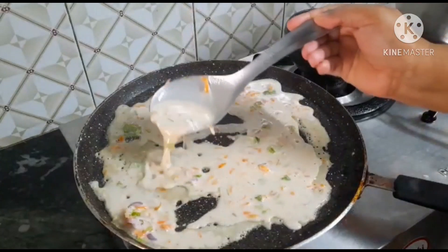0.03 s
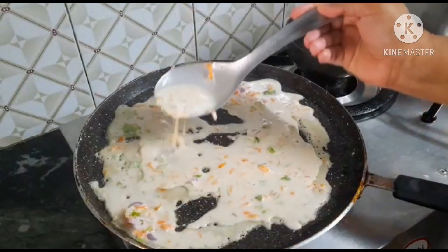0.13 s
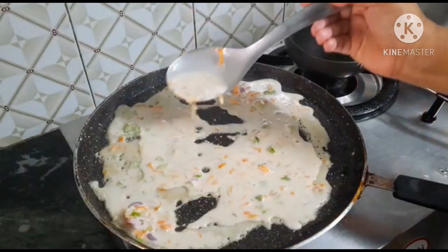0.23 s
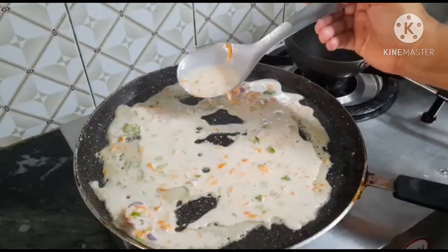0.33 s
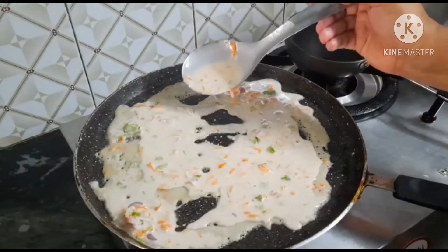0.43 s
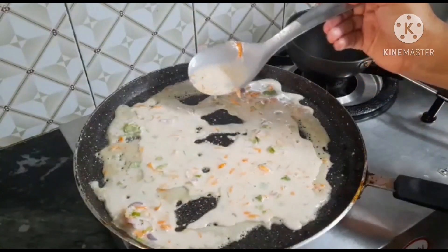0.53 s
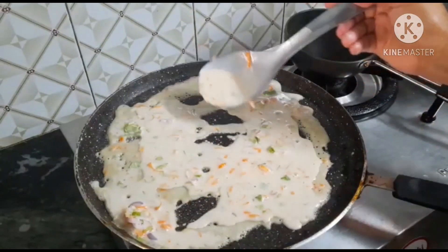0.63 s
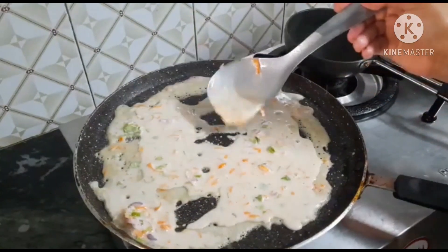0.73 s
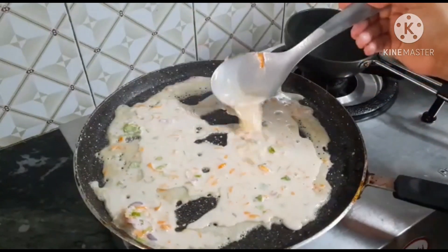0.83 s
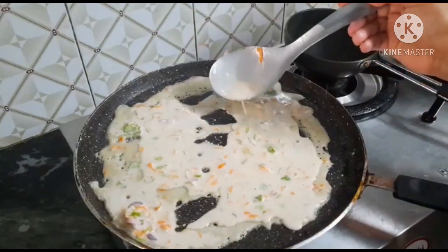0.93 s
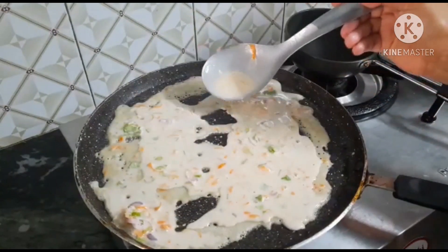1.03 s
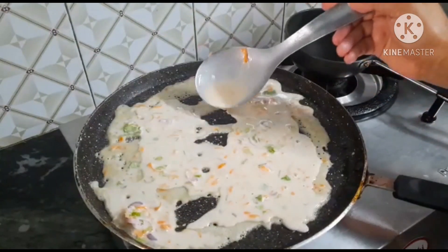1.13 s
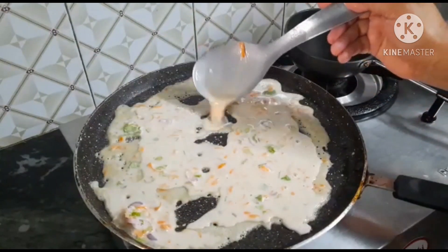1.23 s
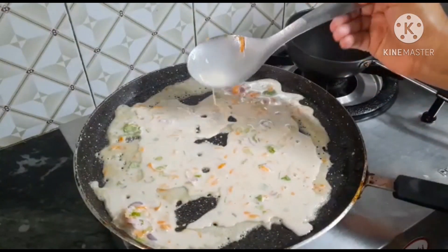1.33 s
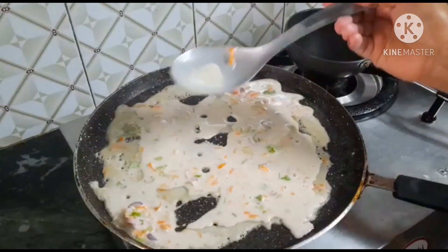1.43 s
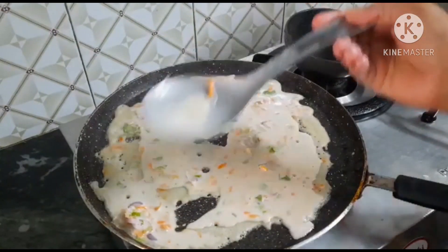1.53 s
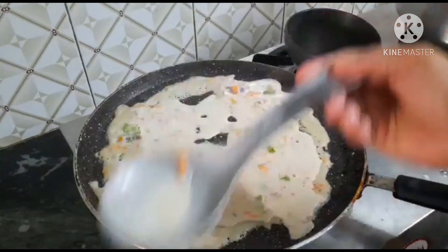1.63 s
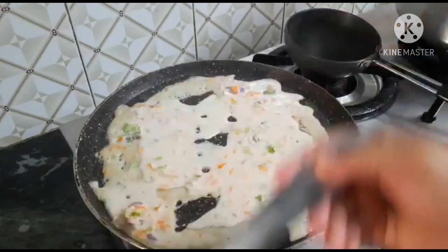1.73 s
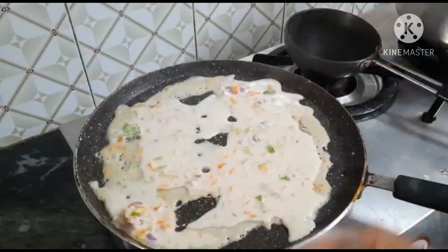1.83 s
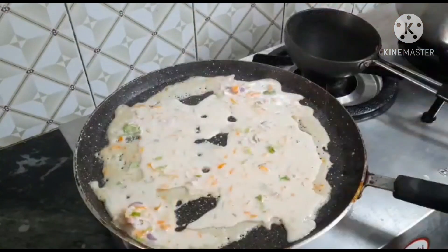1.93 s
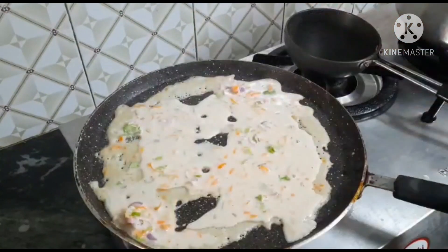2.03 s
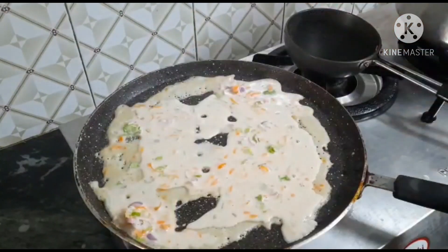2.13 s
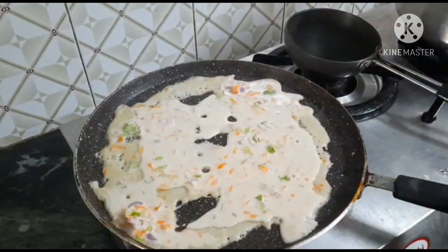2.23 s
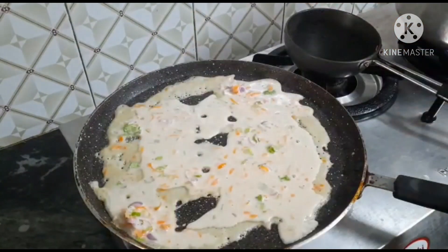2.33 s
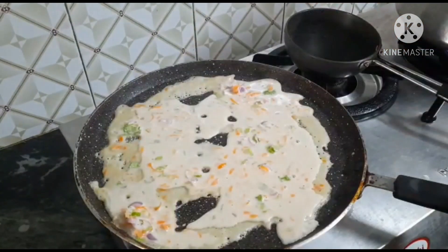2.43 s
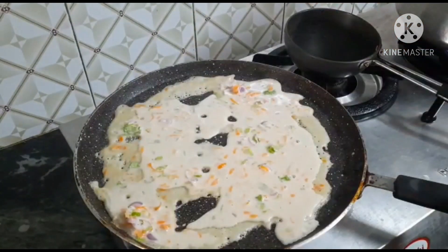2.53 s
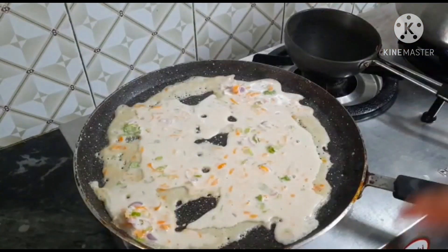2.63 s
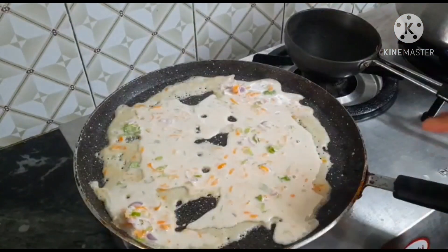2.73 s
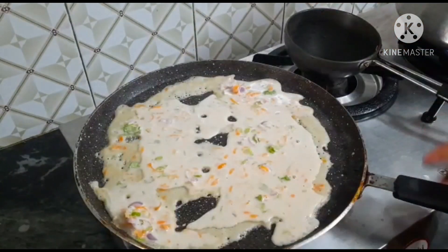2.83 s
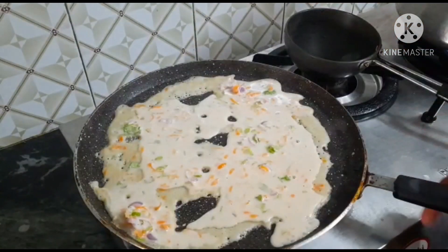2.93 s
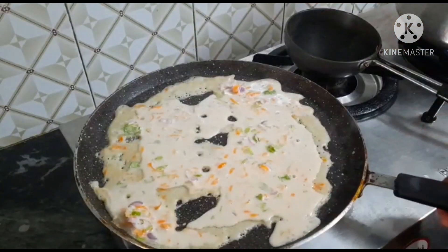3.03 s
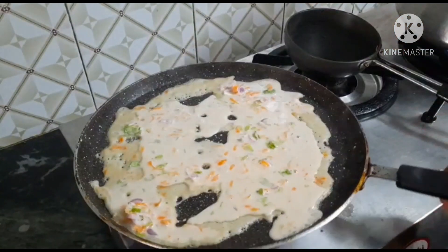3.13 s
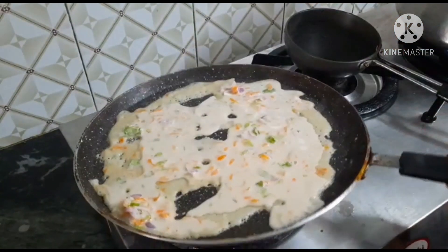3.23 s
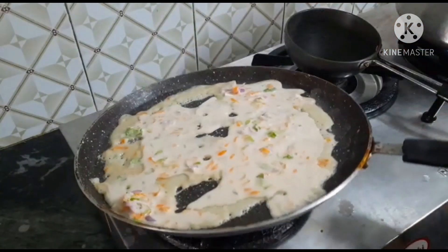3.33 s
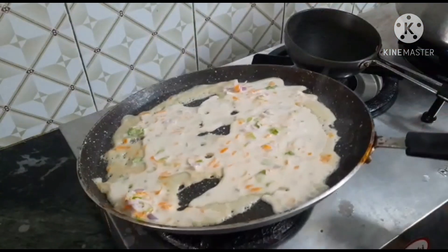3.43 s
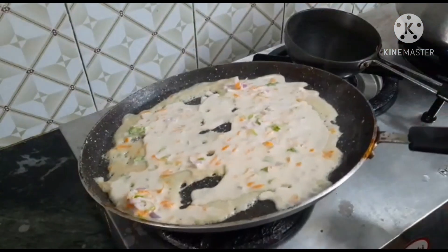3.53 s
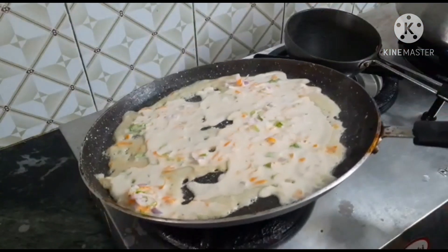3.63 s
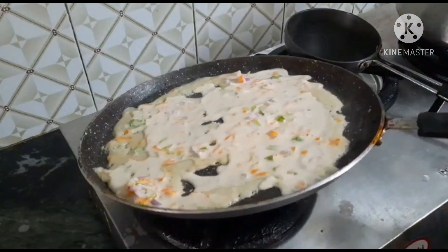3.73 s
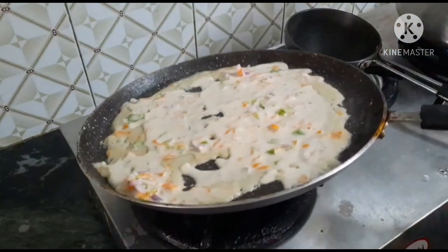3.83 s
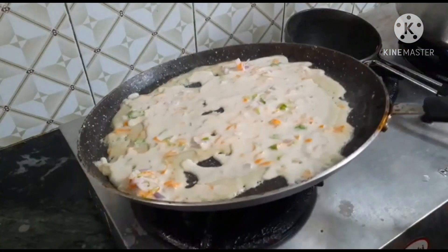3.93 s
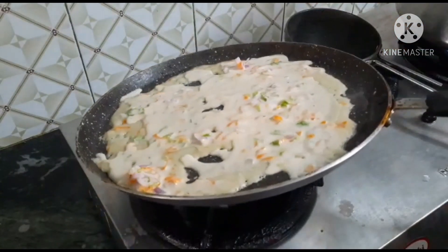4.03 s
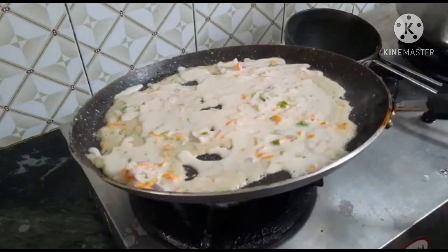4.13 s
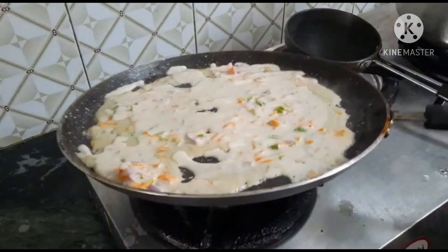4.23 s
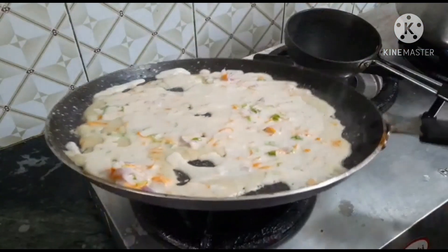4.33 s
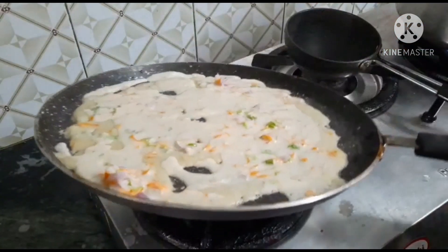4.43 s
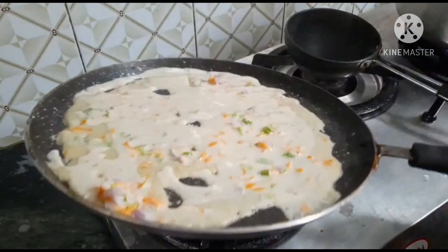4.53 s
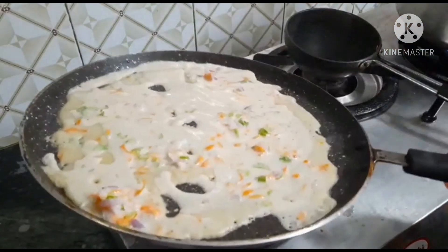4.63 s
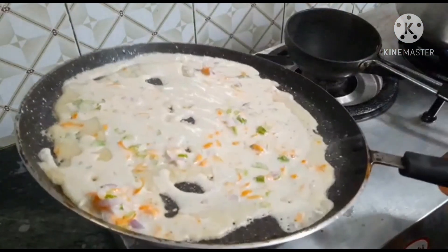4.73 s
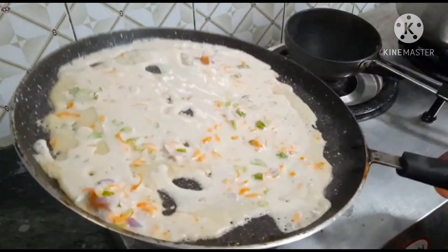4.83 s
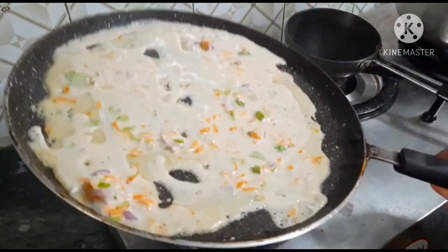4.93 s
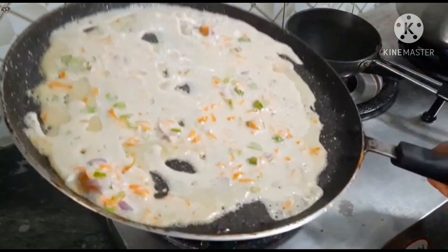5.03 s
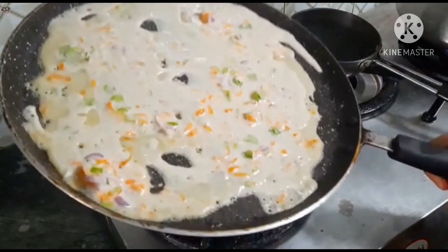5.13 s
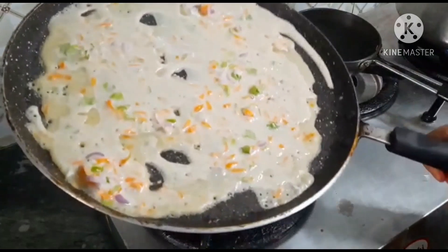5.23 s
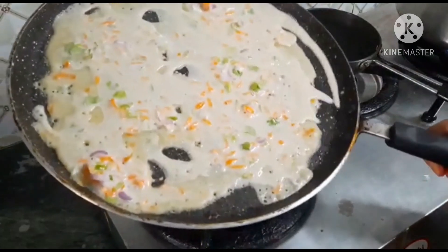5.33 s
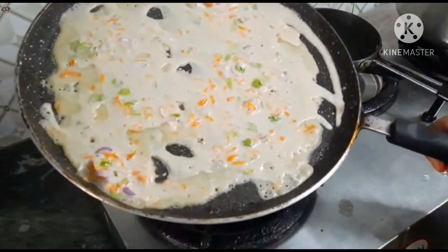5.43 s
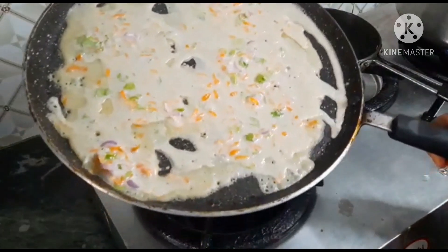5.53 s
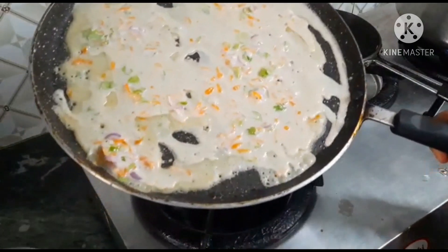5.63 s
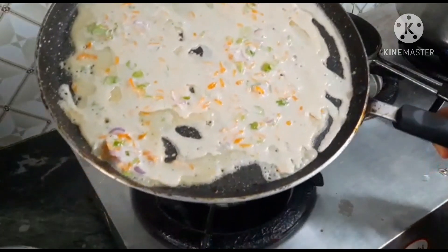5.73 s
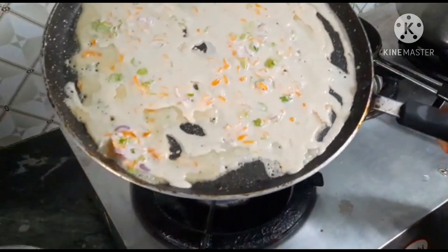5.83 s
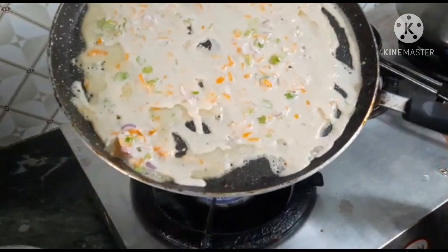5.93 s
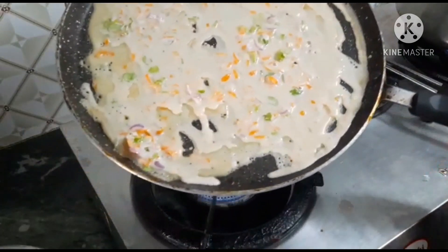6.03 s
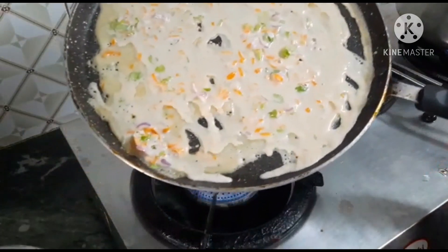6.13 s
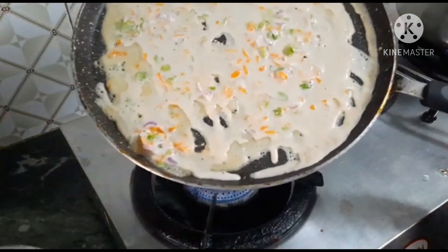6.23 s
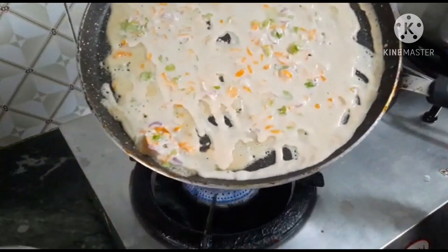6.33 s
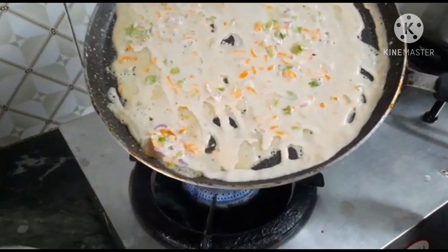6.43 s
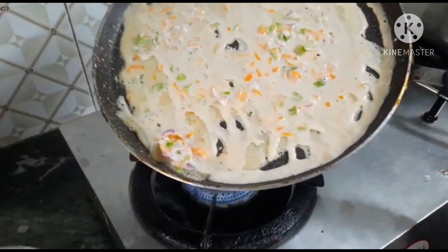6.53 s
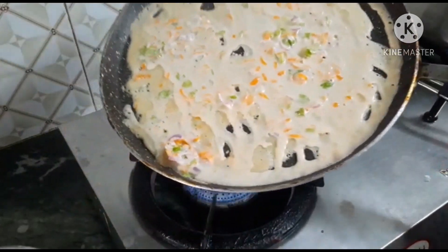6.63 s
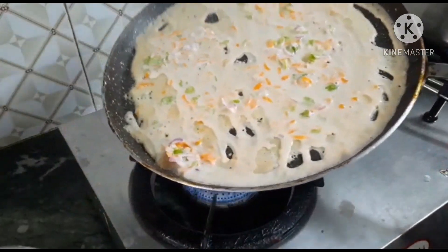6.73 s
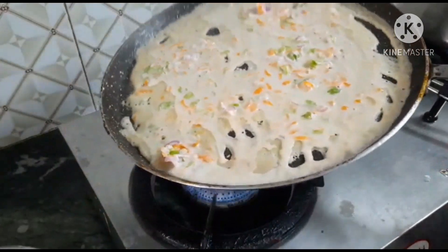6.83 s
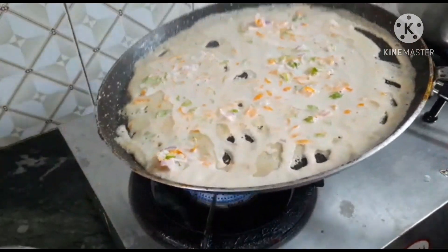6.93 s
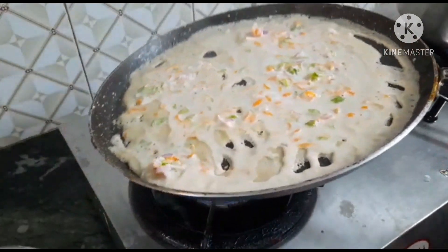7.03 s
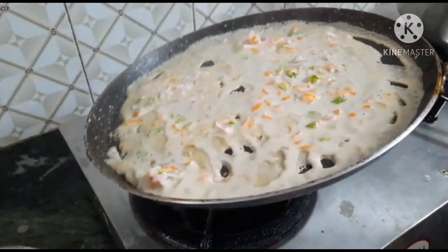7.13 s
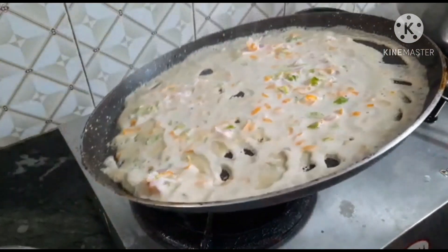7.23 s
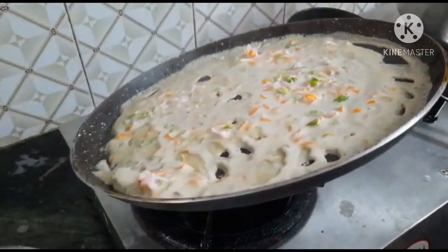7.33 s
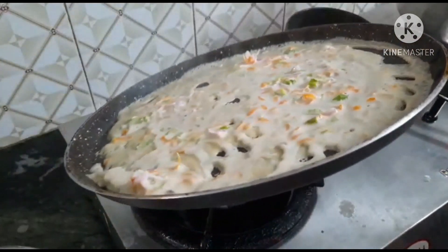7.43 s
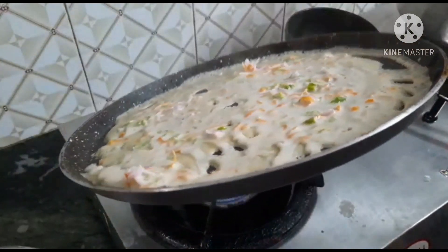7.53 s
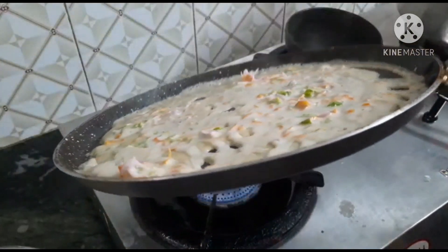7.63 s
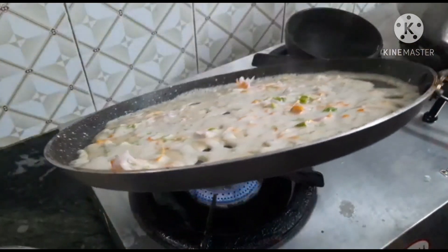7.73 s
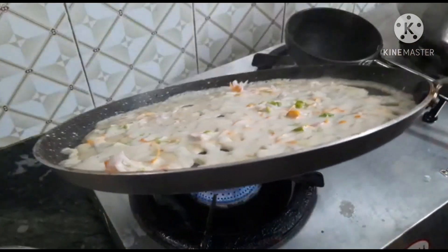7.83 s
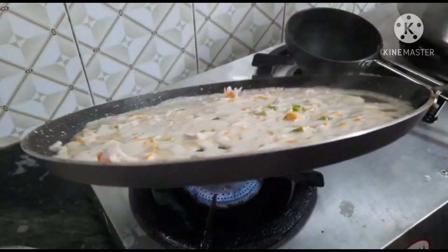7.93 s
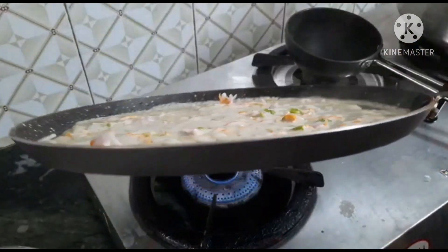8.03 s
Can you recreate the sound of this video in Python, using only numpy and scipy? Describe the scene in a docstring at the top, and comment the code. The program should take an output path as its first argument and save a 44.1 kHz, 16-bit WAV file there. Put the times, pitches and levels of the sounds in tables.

```python
"""Batter on a hot pan

Batter sizzles over a gas flame in a small tiled kitchen: random bursts sound as crackle, spatter and fizz,
with sharp spits of oil, over filtered noise for the flame and the still air. A ladle knocks in the bowl
and is put down with a clank; the pan bumps off its support: pulses and decaying modes. The pan is tilted
round, so that batter runs onto hot metal and the sizzle swells."""
import sys
import numpy as np
from scipy import signal
from scipy.fft import rfft, irfft
from scipy.io import wavfile

SR = 44100
rng = np.random.default_rng(int(sys.argv[2]) if len(sys.argv) > 2 else 0)


def master(y):
    """Save y as 16-bit WAV."""
    cut = np.clip(np.atleast_2d(y).T, -1, 1)
    pcm = np.round(cut * 32767)  # scale
    wavfile.write(sys.argv[1], SR, pcm.astype(np.int16))


N = 356724
TIME = np.arange(N) / SR   # s

# How hard the batter boils, in big bubbles and in small.
# Each row: time in seconds, crackle in dB and spatter in dB, both ahead of the trims in sizzle_levels.
BOIL = [(0.0, -45, -64.5), (0.52, -47, -66), (0.7, -46.5, -63.5), (0.92, -49.5, -67), (1.17, -50.5, -67),
        (1.64, -47.5, -64), (2.03, -47, -66.5), (2.39, -46.5, -63.5), (3.26, -48, -62), (3.74, -45.5, -60),
        (4.08, -47, -59.5), (4.82, -44, -55), (5.5, -45, -52.5), (5.88, -38.5, -49.5), (6.11, -38, -50),
        (6.58, -38, -50.5), (7.79, -45.5, -56.5), (8.09, -47, -58)]
FULL_BOIL_DB = -49.5   # spatter column of BOIL when the tilted pan is freshly coated
# Travel of the first echoes off splashback, stove top and facing wall, one column: delay in seconds.
ECHO_DELAYS = [.0015, .00247, .00787]


def from_db(db):
    """Amplitude gain is ten to the power of decibels over twenty."""
    return 10 ** (np.asarray(db) / 20)


def rms_one(x):
    """Dividing by the root of the mean power brings a signal to rms 1."""
    return x / np.sqrt(np.mean(x ** 2) + 1e-20)


def in_time(rows):
    """Linear interpolation gives each column of a time curve a value at every sample."""
    seconds, *columns = np.transpose(rows)
    return [np.interp(TIME, seconds, column) for column in columns]


def at_hz(points, hz):
    """Interpolation on a log-frequency axis, where equal steps are equal musical intervals."""
    table_hz, values = np.array(points).T
    return np.interp(np.log(np.maximum(hz, 1)), np.log(table_hz), values)


def through(x, response):
    """Convolution: every sample of x starts its own copy of the impulse response."""
    return signal.oaconvolve(x, response)[:N]


def band(x, low_hz, high_hz):
    """A second-order Butterworth design passes a band with gentle slopes."""
    edges_hz = [low_hz, min(high_hz, SR / 2 - 1)]
    return signal.sosfilt(signal.butter(2, edges_hz, "band", fs=SR, output="sos"), x)


def snap(colour, size=8192):
    """Minimum phase: folding the cepstrum gives the most compact causal pulse of a spectrum; peak 1."""
    hz = np.maximum(np.fft.rfftfreq(size, 1 / SR), 1)
    octaves_outside = np.abs(np.log2(hz / np.clip(hz, colour[0][0], colour[-1][0])))
    spectrum_db = at_hz(colour, hz) - 24 * octaves_outside
    cepstrum = irfft(np.log(from_db(spectrum_db)))
    cepstrum[size // 2:] = 0
    pulse = irfft(np.exp(rfft(2 * cepstrum)))[:size // 2]
    return pulse / np.abs(pulse).max()


def clicks(rows):
    """An ideal contact is an impulse: one for each pair of seconds and dB."""
    out = np.zeros(N)
    for s, db in rows:
        out[round(s * SR)] += from_db(db)
    return out


def starting_at(s, sound):
    """Delay by leading silence places a short sound at its moment."""
    return np.pad(sound, (round(s * SR), N))[:N]


def swell(s, length):
    """A Gaussian envelope rises and falls smoothly around a moment; top 1."""
    return np.exp(-(2 * (TIME - s) / length) ** 2)


def ring(hz, t60, rise_s):
    """A damped mode: one second of a sine that swells briefly and dies away exponentially."""
    t = TIME[:SR]
    decay = from_db(-60 * t / t60)
    return np.sin(2 * np.pi * hz * t) * decay * (1 - np.exp(-t / rise_s))


def struck(s, modes, ring_db, rise_s):
    """Modal superposition: a blow sets all modes ringing, neighbours in opposite sense."""
    total = sum((-1) ** k * from_db(db + ring_db) * ring(hz, t60, rise_s)
                for k, (hz, db, t60) in enumerate(modes))
    return starting_at(s, total)


def kitchen(x, wet_db, build_s=0.0034):
    """Diffuse reverberation: direct sound plus a noise tail off the tiles, each band with its own decay."""
    # Each row: frequency in Hz, reverberation time (60 dB decay) in seconds.
    room_t60 = [(100, 0.7), (500, 0.43), (2000, 0.53), (6000, 0.36), (14000, 0.038)]
    t, edges = TIME[:SR * 3 // 4], np.geomspace(40, 20000, 10)
    hz = np.fft.rfftfreq(len(t), 1 / SR)
    white = rfft(rng.standard_normal(len(t)))
    tail = 0
    for low, high in zip(edges, edges[1:]):
        t60 = at_hz(room_t60, np.sqrt(low * high))
        band_noise = irfft(white * (hz >= low) * (hz < high), len(t))
        tail = tail + band_noise * from_db(-60 * t / t60)
    tail = tail * (1 - np.exp(-(t / build_s) ** 2))
    return x + from_db(wet_db) * through(x, tail / np.linalg.norm(tail))


def scatter(train, near_db, near_t60, far_db, far_t60):
    """Incoherent scattering: echo powers off the pan's rim, near wall and far tiles add, with random phase."""
    t = TIME[:SR // 2]

    def echo_power(db, t60):
        """Exponential decay of echo power, with its sum set relative to the burst."""
        decay = from_db(-60 * t / t60) ** 2
        return from_db(db) ** 2 * decay / decay.sum()

    power = through(train ** 2, echo_power(near_db, near_t60) + echo_power(far_db, far_t60))
    return train + np.sqrt(np.abs(power)) * rng.standard_normal(N)


def drift(rate):
    """Slow random modulation: chance values, rate per second, joined by straight lines; rms 1."""
    knots = rng.standard_normal(int(N / SR * rate) + 2)
    return rms_one(np.interp(TIME * rate, np.arange(len(knots)), knots))


def bursts(per_s, spread_db, largest=4.3):
    """Random bursting: independent impulses of random size and sign, with power evened over the rate."""
    size_db = spread_db * np.minimum(rng.exponential(1, N), largest)
    sizes = from_db(size_db) * rng.choice([-1, 1], N)
    return rms_one(sizes * (rng.random(N) < per_s / SR) / np.sqrt(per_s))


def sizzle_levels():
    """Source strength follows the boil: fizz tracks spatter; drips lift fizz, and crackle a little."""
    # Batter drips from the ladle onto bare metal and hisses.
    # Each row: middle in seconds, length in seconds, rise of the fizz in dB.
    drip_rows = [(0.083, 0.5, 6), (0.583, 0.22, 13), (0.83, 0.2, 9.5), (1.557, 0.15, 8)]
    crackle_db, spatter_db = in_time(BOIL)
    drip_db = sum(db * swell(s, length) for s, length, db in drip_rows)
    fizz_db = -46 + 1.165 * (spatter_db - FULL_BOIL_DB) + drip_db
    return crackle_db - 0.58 + 0.12 * drip_db, spatter_db + 2.5, fizz_db


def sizzle():
    """Boiling noise: more wet batter on hot metal means more bursts, partly shared by every register."""
    # Colours of the bursts. Each row: frequency in Hz, relative level in dB.
    crackle_colour = [(200, -49.5), (310, -21.5), (400, -21), (490, -15.5), (570, -12.5), (760, -8),
                      (1080, -3.5), (1500, 1.5), (2050, -1.5), (2750, -1.5), (3300, -9.5), (3800, -20),
                      (4600, -30)]
    spatter_colour = [(3000, -6), (4000, -8.5), (5000, -3), (6500, -2), (8000, 1.5), (9000, -2),
                      (10500, -5.5), (13000, -16), (16000, -40)]
    fizz_colour = [(5000, -16.5), (7500, -5), (9000, 2.5), (10200, 1), (11500, -3), (13000, -9.5),
                   (14500, -9), (16000, -11)]
    crackle_db, spatter_db, fizz_db = sizzle_levels()
    per_s = np.minimum(2400 * from_db(.8 * (spatter_db + 55)), SR / 2)
    common = bursts(per_s, spread_db=3.5, largest=4.64)
    blisters = from_db(-11.5) * bursts(per_s / 45, spread_db=1.5, largest=6.3)   # rare, large pops
    clumps_db = .5 * drift(rate=49)

    def register(colour, level_db, share, spread_db, flutter_db):
        """Partial correlation: shared and own bursts mix by power, then take one colour."""
        own = bursts(per_s, spread_db)
        train = np.sqrt(share) * common + np.sqrt(1 - share) * own + blisters
        train = scatter(train, near_db=-2.5, near_t60=0.031, far_db=-1, far_t60=0.66)
        sound = rms_one(through(train, snap(colour)))
        return sound * from_db(level_db + clumps_db + flutter_db * drift(rate=21))

    crackle = register(crackle_colour, crackle_db, share=0.24, spread_db=2.5, flutter_db=0.45)
    # a fiercer boil makes smaller bubbles, which lift the upper part of the crackle
    fierce = np.clip(0.035 * (crackle_db + 53), 0, 1)
    crackle = (crackle + fierce * band(crackle, 1710, 2770)) / (1 + 0.23 * fierce)
    spatter = register(spatter_colour, spatter_db, share=0.64, spread_db=-1.0, flutter_db=0.2)
    fizz = register(fizz_colour, fizz_db, share=0.19, spread_db=2.5, flutter_db=1.13)
    return kitchen(crackle + spatter + fizz, wet_db=-15.5)


def spits():
    """Impulsive radiation: oil spits with a sharp snap and a short spray; random spits grow with the boil."""
    # Spits at set moments. Each row: time in seconds, level in dB ahead of a common cut of 5.5 dB.
    spit_rows = [(3.5264, -28.5), (3.5862, -28), (4.1794, -31), (4.1824, -24), (4.2453, -25.5),
                 (4.939, -25), (5.4745, -26), (5.8581, -24), (6.097, -22), (6.2517, -23), (6.4096, -18),
                 (6.7046, -21)]
    # Each row: frequency in Hz, relative level in dB.
    spit_colour = [(1300, -3), (2700, -6), (4000, -18), (6000, -1), (8500, 4), (11000, 0.5), (13000, -5),
                   (15500, -22)]
    per_s, at_full_boil_db, spread_db = 26, -31, 2.0
    _, spatter_db = in_time(BOIL)
    size_db = at_full_boil_db + .75 * (spatter_db - FULL_BOIL_DB)
    luck_db = spread_db * np.clip(rng.standard_normal(N), -2, 2)
    random_spits = from_db(size_db + luck_db) * (rng.random(N) < per_s / SR)
    snaps = from_db(-5.5) * clicks(spit_rows) + random_spits
    spray = scatter(snaps, near_db=5, near_t60=.035, far_db=-3, far_t60=.35)
    return through(spray, snap(spit_colour))


def background():
    """Filtered noise: the gas flame's low murmur over the still air of the kitchen."""
    # The flame's strength. Each row: time in seconds, rms level in dB.
    flame_rows = [(0, -77), (1.5, -72.5), (2.6, -63), (3.9, -64.5), (4.4, -72), (4.8, -56.5), (6.2, -74.5),
                  (8.09, -81)]
    # Colours of flame and air. Each row: frequency in Hz, relative level in dB.
    flame_colour = [(25, -24), (45, -11), (60, -14), (78, -26), (100, -9), (117, 6), (140, -6.5),
                    (175, -19), (300, -20), (600, -29)]
    air_colour = [(12, -46), (20, -34), (48, -7.5), (112, -4), (201, -14.5), (309, -9), (404, -15.5),
                  (512, -14.5), (568, 5), (700, -1.5), (910, -15), (1540, -120)]
    flame_db, = in_time(flame_rows)
    flame = from_db(flame_db) * rms_one(through(rng.standard_normal(N), snap(flame_colour)))
    air = from_db(-64.5) * rms_one(through(rng.standard_normal(N), snap(air_colour)))
    return flame + air


def rubs():
    """Friction noise: short swells of a narrow band for slops of batter and a hand on the handle."""
    # Each row: middle in seconds, length in seconds, centre in Hz, rms level at the top of the swell in dB.
    rub_rows = [(.08, 0.3, 407, -66.5), (0.267, 0.064, 1340, -42), (3.124, .1, 150, -73),
                (3.53, 0.14, 394, -58.5), (3.722, 0.11, 350, -60), (5.597, 0.11, 312, -51.5),
                (5.68, 0.43, 297, -63.5)]
    total = np.zeros(N)
    for s, length, hz, db in rub_rows:
        friction = rms_one(band(rng.standard_normal(N), hz * 0.78, hz * 1.3))
        total += from_db(db) * swell(s, length) * friction
    return total


def knocks():
    """Impact excitation: a damped ring, a thud, a faint after-ring and slowly swelling low room modes."""
    # Knocks and ticks of ladle, bowl and pan handle.
    # Each row: start in seconds, ring level in dB, ring in Hz, its 60 dB decay in seconds, thud level in dB.
    knock_rows = [(1.1627, -17.5, 916, 0.035, -30.5), (1.6295, -37, 4660, 0.0097, -70),
                  (1.632, -38.5, 556, 0.095, -58), (2.2052, -27.5, 1065, 0.09, -31),
                  (2.3217, -22, 1900, 0.012, -62), (4.079, -29.5, 1750, 0.016, -54),
                  (4.1814, -27.5, 2550, 0.015, -49), (4.89, -26, 1290, 0.018, -44),
                  (4.895, -29, 690, 0.018, -47), (4.897, -36.5, 321, .06, -43)]
    # Each row: frequency in Hz, relative level in dB.
    thud_colour = [(60, -12), (120, -8), (400, 0), (650, -3), (900, 7.5), (1250, -1.5), (1800, 2),
                   (2800, -7.5), (4000, -28), (9000, -30)]
    # Low modes of the room, one column: frequency in Hz.
    room_modes_hz = [99.2, 100, 134.3]
    rings, tails = np.zeros((2, N))
    boom = sum(ring(hz, t60=0.35, rise_s=0.11) for hz in room_modes_hz)
    for s, ring_db, hz, t60, thud_db in knock_rows:
        rings += starting_at(s, from_db(ring_db) * ring(hz, t60, rise_s=0.0017))
        # three detuned modes beat with one another
        after = sum(ring(hz * ratio, t60=.27, rise_s=.012) for ratio in (.91, .985, 1.035))
        tails += starting_at(s, from_db(thud_db - 14) * after + from_db(thud_db - 8.5) * boom)
    blows = clicks([(s, thud_db) for s, *_, thud_db in knock_rows])
    thuds = scatter(blows, near_db=-8.0, near_t60=0.065, far_db=16.0, far_t60=0.41)
    return kitchen(rings, wet_db=-8.0) + through(thuds, snap(thud_colour)) + tails


def ladle():
    """Modal ringing, steel on steel: a bright, buzzing crack and bounces, then the modes ring on."""
    # The steel ladle lands and bounces. Each row: time in seconds, peak of the direct contact in dB.
    clank_rows = [(2.5118, -12.5), (2.5148, -10.5), (2.5295, -14.5), (2.549, -21), (2.5698, -17)]
    # Modes of the ladle. Each row: frequency in Hz, relative level in dB, 60 dB decay in seconds.
    ladle_modes = [(1186, -6, .45), (1224, -5, .42), (1247, -3, .45), (1279, 0, .4), (1386, -7, .42),
                   (1440, -6, .45), (1599, -7, .45), (1992, -6, .38), (2079, -5, .4), (2152, -4, .4),
                   (2172, -6, .4), (2329, -3, .4), (2416, -5, .36), (2465, -4, .38), (2573, -4, .27),
                   (2762, 1, .28), (2816, 2, .27), (2862, 2, .26), (2925, 0, .22), (4947, -20, .3),
                   (5712, -16, .3), (5911, -17, .3), (6325, -19, .28)]
    # Each row: frequency in Hz, relative level in dB.
    clank_colour = [(100, -29), (350, -20), (520, -6.5), (950, -9.5), (1250, 9.5), (1750, -1), (2200, 7),
                    (2900, 3.5), (3700, -18.5), (6000, -11), (8000, -15.5), (11000, -19.5), (15500, -36)]
    chatter = scatter(clicks(clank_rows), near_db=2.5, near_t60=.02, far_db=2, far_t60=.47)
    ringing = struck(clank_rows[0][0], ladle_modes, ring_db=-36.5, rise_s=.001)
    return through(chatter, snap(clank_colour)) + ringing


def pan_lift():
    """Structure-borne sound: heavy, soft contacts set the modes of pan and stove top booming."""
    # The pan bumps and rattles over its support as it is lifted.
    # Each row: time in seconds, peak of the direct contact in dB.
    bump_rows = [(2.9165, -21.5), (2.9225, -35), (2.927, -22), (2.937, -24), (2.947, -28), (2.964, -31),
                 (3.001, -33.5)]
    # Modes of pan and stove top. Each row: frequency in Hz, relative level in dB, 60 dB decay in seconds.
    stove_modes = [(98.6, -2, 0.38), (113.7, -3, 0.5), (141, 1.5, 0.35), (218.6, -1, 0.38),
                   (309, -17, 0.62), (417, -1, 0.26), (441, -2, 0.36), (730, 1, 0.32), (845, -11, 0.32),
                   (860, -3, 0.15), (980, -1, 0.2), (1056, 5, 0.16)]
    # Each row: frequency in Hz, relative level in dB.
    bump_colour = [(40, -25), (100, -13), (200, 1), (330, -7.5), (450, 4), (660, -11.5), (850, 3.5),
                   (1150, -5), (1450, -18.5), (2700, -22), (4000, -40)]
    thud = through(clicks(bump_rows), snap(bump_colour))
    boom = struck(bump_rows[0][0], stove_modes, ring_db=-35, rise_s=.009)
    return kitchen(thud, wet_db=-2) + boom


def near_walls(x):
    """Comb filtering: close surfaces add a few slightly dulled echoes to the direct sound."""
    # First echoes off the splashback, the stove top and the facing wall.
    # Each row: delay in seconds, signed gain as a ratio, upper edge in Hz (held below half the sample rate).
    echo_rows = [(ECHO_DELAYS[0], 0.016, 15000), (ECHO_DELAYS[1], -0.027, 24000), (ECHO_DELAYS[2],
                 -0.12, 5400)]
    out = x
    for delay_s, gain, edge_hz in echo_rows:
        echo = np.interp(TIME - delay_s, TIME, band(x, 23, edge_hz), left=0)
        out = out + gain * echo
    return out


def scene():
    """Linear superposition at one microphone, the same in both channels."""
    echoed = near_walls(sizzle() + spits() + background() + rubs())
    mono = echoed + knocks() + ladle() + pan_lift()
    return np.array([mono, mono])


def record(dry):
    """Band limiting: an elliptic low-pass cuts the top steeply above 15850 Hz."""
    return signal.sosfilt(signal.ellip(12, .1, 80, 15850, fs=SR, output="sos"), dry)


dry = scene()
out = record(dry)
master(out)
```